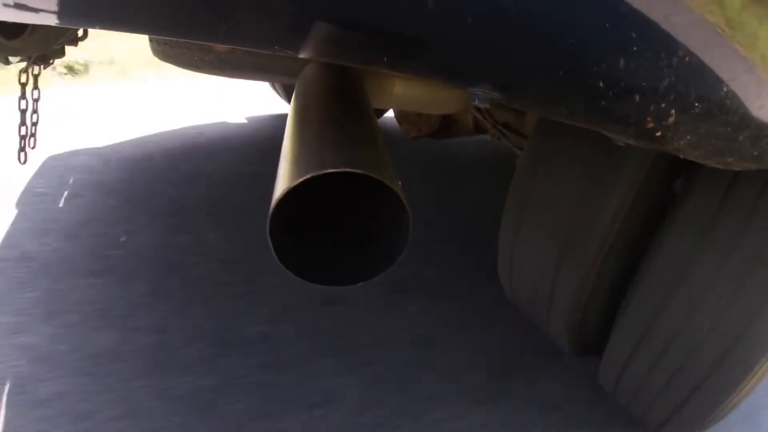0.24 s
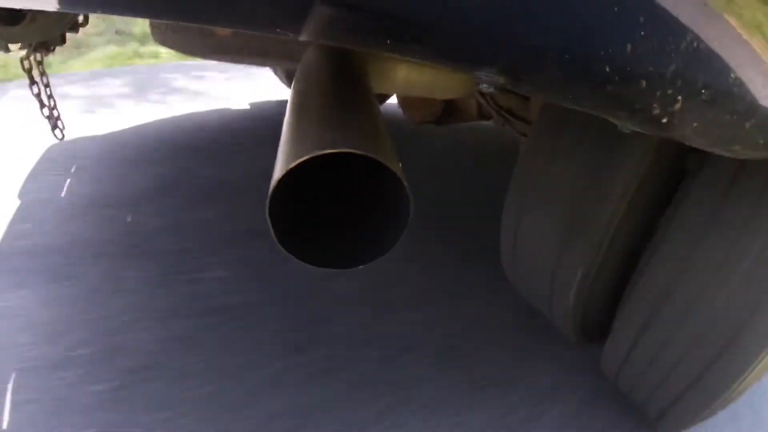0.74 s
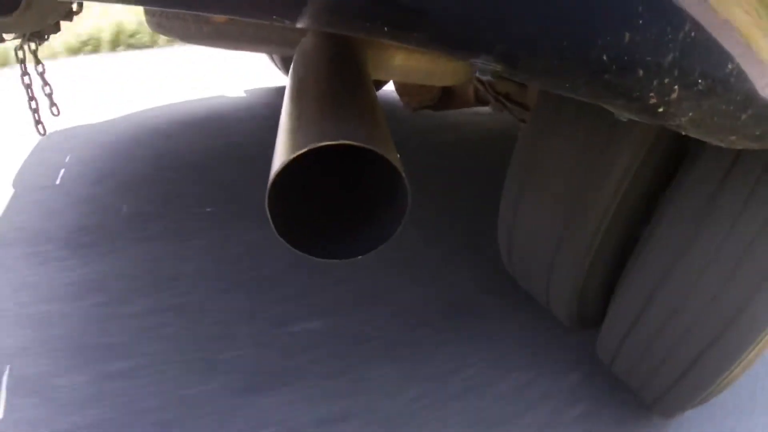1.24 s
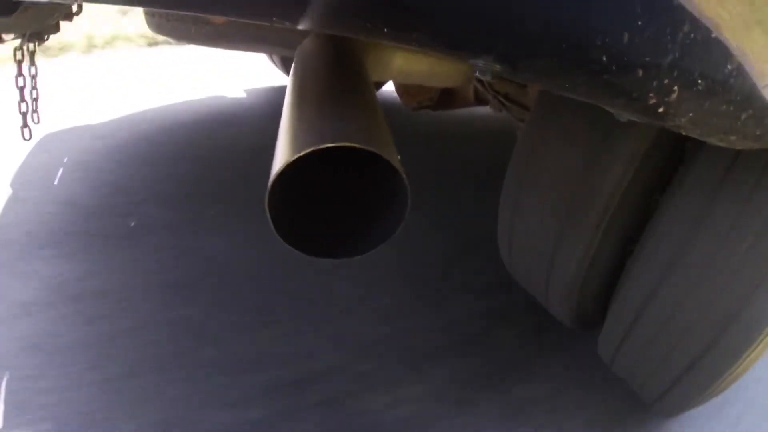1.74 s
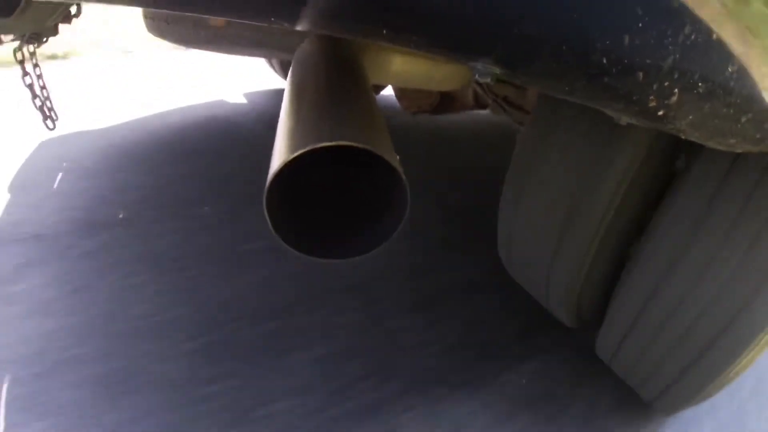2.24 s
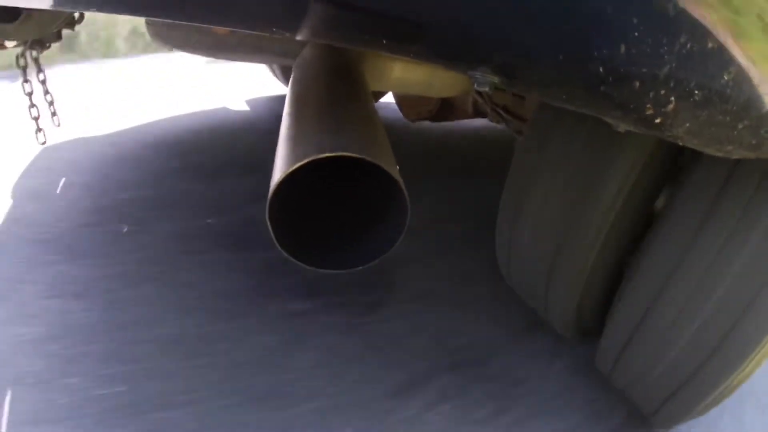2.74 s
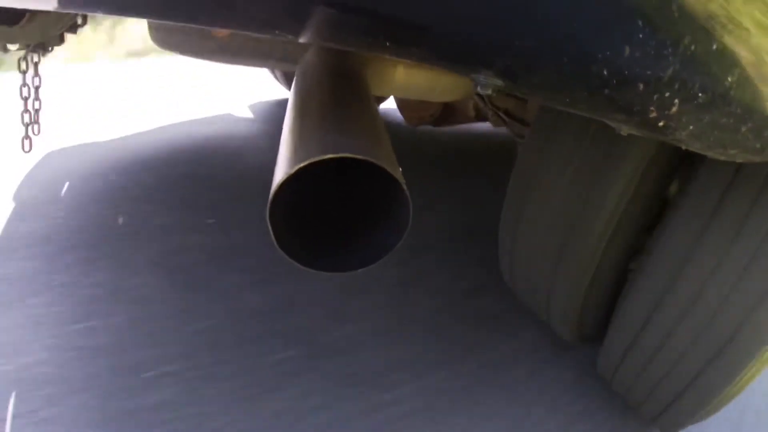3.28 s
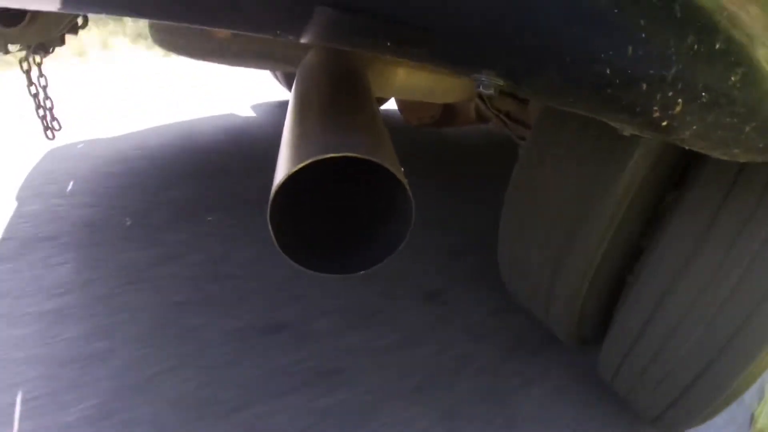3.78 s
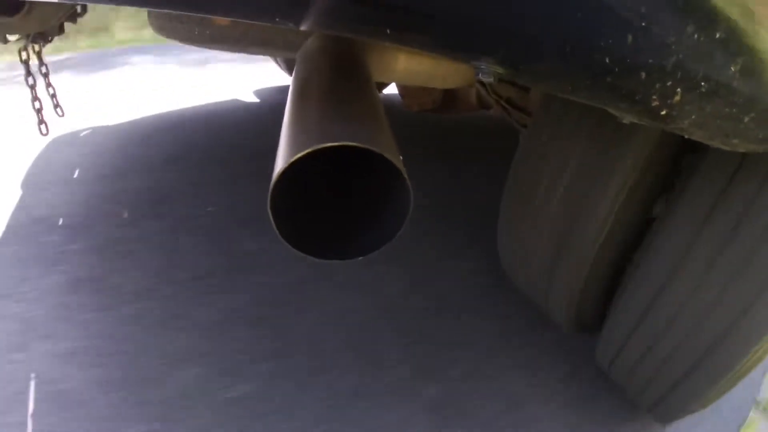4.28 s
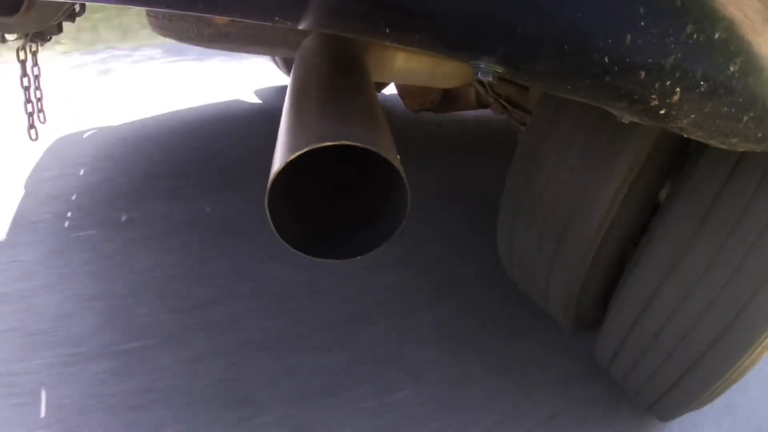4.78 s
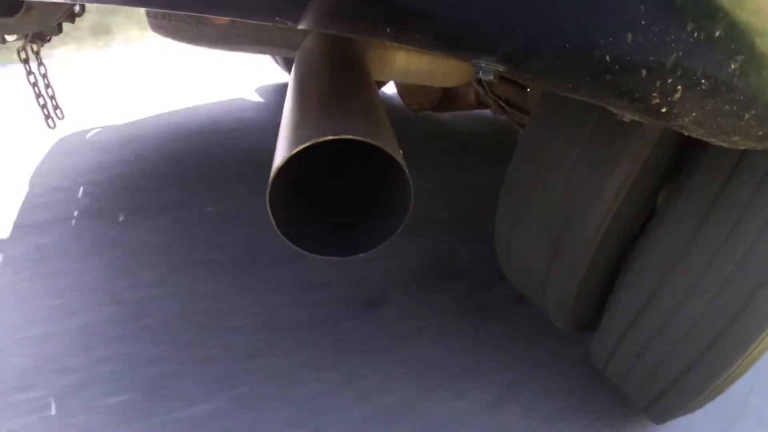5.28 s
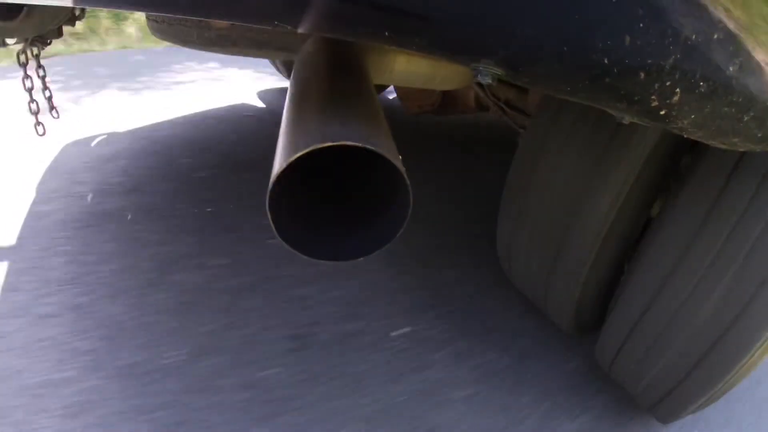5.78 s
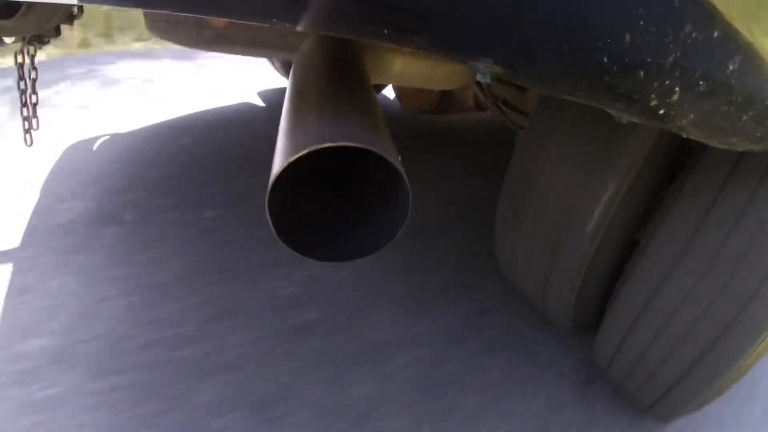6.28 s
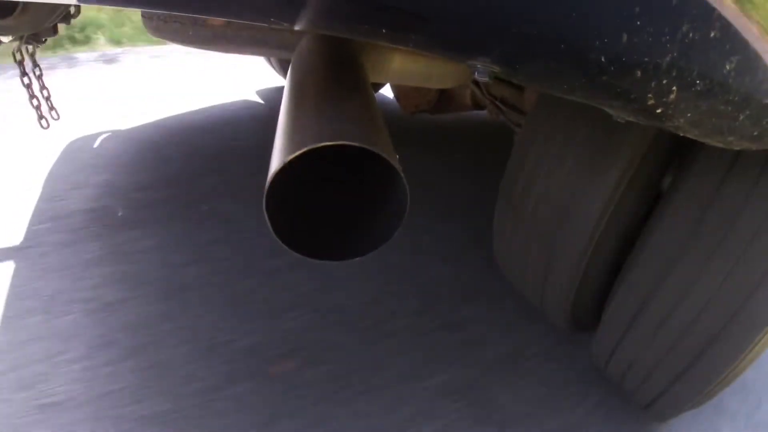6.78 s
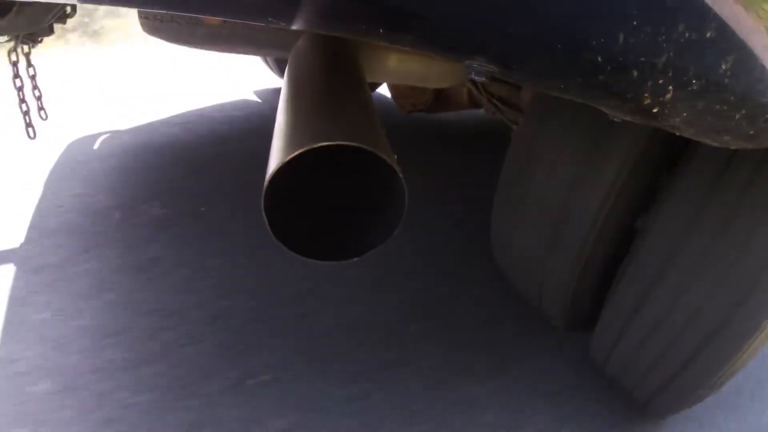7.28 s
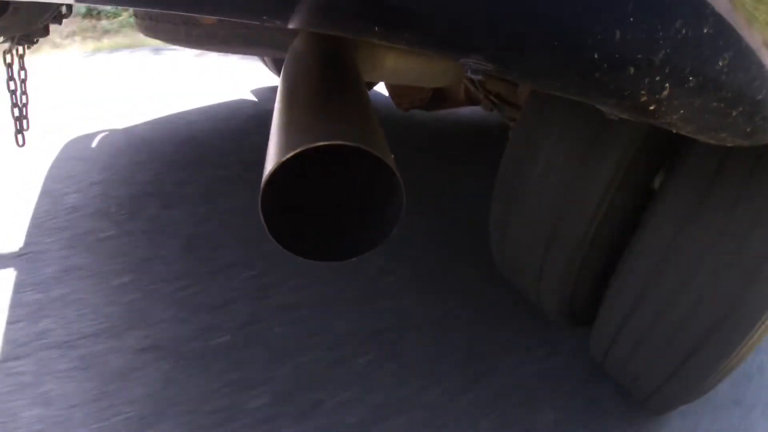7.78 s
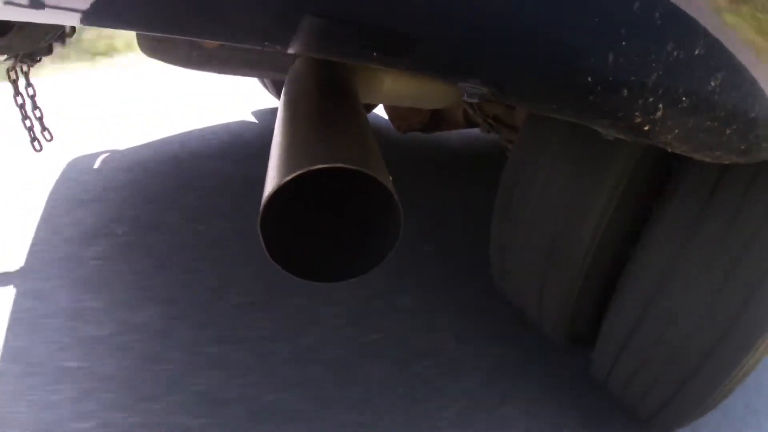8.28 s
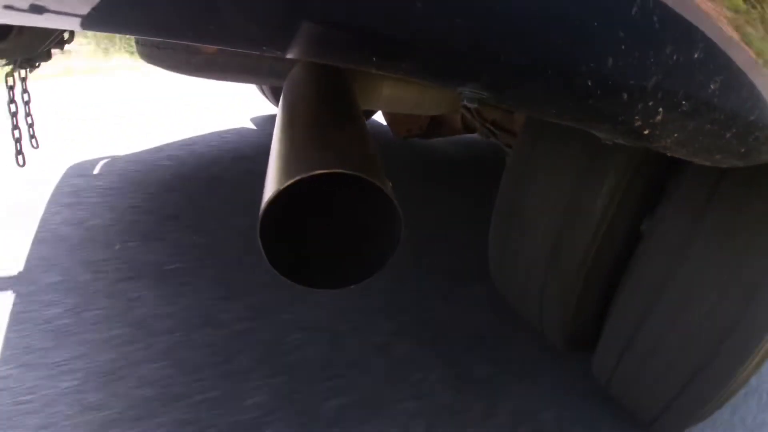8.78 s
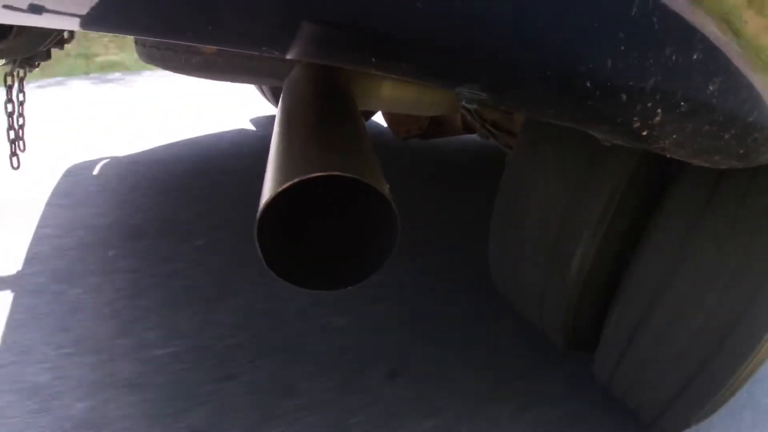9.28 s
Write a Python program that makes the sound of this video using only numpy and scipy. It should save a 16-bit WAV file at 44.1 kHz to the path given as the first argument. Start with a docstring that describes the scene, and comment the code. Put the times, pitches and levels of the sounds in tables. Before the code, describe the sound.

Close at the tailpipe, a driving diesel truck drones, sags, pulls harder and swells into rushing gas, over wind rumble and tyre noise.

```python
"""Diesel pickup at the tailpipe

On the road with a V8 diesel pickup, microphone just behind the pipe. The firing note drones and slowly
sags; at five seconds the engine picks up, lopes, pulls, and lopes again. Gas roars, rasps and hisses out
in puffs with a faint turbo whistle, swelling to a rush at the end. Wind buffets the mic; tyres roll by it."""
import sys
import numpy as np
from scipy import signal
from scipy.fft import rfft, irfft, next_fast_len
from scipy.io import wavfile
from scipy.ndimage import uniform_filter1d, minimum_filter1d

SR = 44100
rng = np.random.default_rng(int(sys.argv[2]) if len(sys.argv) > 2 else 0)


def log_audio(samples):
    """Write samples as a 16-bit WAV file to the path given in sys.argv[1]."""
    # one column per channel
    frames = np.atleast_2d(samples).T
    # limit to full scale, then quantise
    limited = np.clip(frames, -1, 1)
    pcm = np.round(limited * 32767).astype(np.int16)
    wavfile.write(sys.argv[1], SR, pcm)


N = 420273
TIME = np.arange(N) / SR
BIN_HZ = np.fft.rfftfreq(N, 1 / SR)
CYLINDERS = 8

# Engine speed. Each row: time in seconds, firings per second.
FIRING_RATE = [(0, 106.7), (1, 106.1), (2, 104.1), (3, 101.1), (4.5, 96.9), (5, 93.5), (5.1, 102),
               (5.45, 115), (5.75, 120), (6.1, 118.1), (7, 115.2), (8, 112.9), (8.8, 113.6), (9.2, 118.2),
               (9.53, 116)]
# How the engine runs. Each row: time in seconds, share of pulling, share of loping; the rest is cruising.
ENGINE_LOAD = [(0, 0.05, 0), (4.98, 0, 0.09), (5.07, 0.3, 1), (5.52, 0.18, 0.73), (5.66, 1, 0.03),
               (6.6, 0.98, 0.14), (8.08, 0.34, 0), (8.24, 0.12, 1), (9.53, 0.18, 0.86)]
# Surges of turbulence in the pipe. Each row: middle and length in seconds, then dB added to the low boom,
# to the hollow ring, and to hiss and rasp.
PIPE_SURGES = [(.05, 1.04, 10.5, 3.5, .7), (1.28, 0.48, 10, -0.5, 0.5), (2.33, .6, -3, -0.5, 2.2),
               (3.15, 1.38, 10.5, 2.5, 0.7), (4.25, 0.92, 9.5, 4, 0.9), (4.75, 0.51, 10, -0.5, .7),
               (5.1, 0.22, 2, 3.5, -2), (5.45, 0.49, 2.5, 5.5, 2), (7.9, 0.49, -1, 1.5, -0.5)]


def amp(db):
    """Decibels to gain."""
    return 10 ** (np.asarray(db) / 20)


def unit(x):
    """Scales to an rms of one."""
    return x / np.sqrt(np.mean(x ** 2) + 1e-20)


def curves(rows):
    """Each column of a time table, joined by straight lines."""
    seconds, *columns = np.transpose(rows)
    return [np.interp(TIME, seconds, column) for column in columns]


def swells(rows):
    """Each event rises and falls in one arch; one dB curve per strength column."""
    return sum(np.outer(db, np.maximum(1 - (2 * (TIME - middle) / length) ** 2, 0))
               for middle, length, *db in rows)


def shape(points):
    """A spectrum in dB, joined on a log-frequency axis."""
    hz, db = np.transpose(points)
    return np.interp(np.log(BIN_HZ + 1), np.log(hz), db)


def coloured(db):
    """Noise with the given spectrum and an rms of one."""
    size = next_fast_len(N, True)
    gain = np.interp(np.fft.rfftfreq(size, 1 / SR), BIN_HZ, amp(db))
    return unit(irfft(rfft(rng.standard_normal(size)) * gain, size)[:N])


def wander(rate_hz):
    """Smooth random drift, changing up to about the given rate."""
    return coloured(-20 * np.log10(1 + (BIN_HZ / rate_hz) ** 4))


def rush(start_s=8.393, rise_s=0.97):
    """Share of the final rush of gas, which builds smoothly from 0 to 1 and stays."""
    return np.sin(np.pi / 2 * np.clip((TIME - start_s) / rise_s, 0, 1)) ** 2


def level(cruise_db, pull_db, lope_db, rush_db):
    """A layer's cruising level in dB, plus what pulling, loping and the final rush add."""
    pull, lope = curves(ENGINE_LOAD)
    return cruise_db + pull_db * pull + lope_db * lope + rush_db * rush()


def drone(cycle):
    """The firing note, almost a sine after the long pipe; no two combustions are quite alike."""
    level_db = level(-12.5, pull_db=0.85, lope_db=-4.5, rush_db=-6.5) + 0.66 * wander(rate_hz=51)
    return np.sqrt(2) * amp(level_db) * np.cos(2 * np.pi * CYLINDERS * cycle)


def burble(cycle):
    """Unequal cylinders add lines at multiples of the cycle rate; their strength follows the load."""
    # Each row: multiple of the cycle rate, then rms level in dB when cruising, pulling and loping.
    cycle_lines = [(5, -46, -34, -40), (6, -51, -30, -25), (7, -36, -32, -33), (9, -31, -31, -30),
                   (10, -38, -27, -23), (11, -32, -30, -38), (12, -40, -35, -35), (13, -43, -36, -40),
                   (14, -41, -32, -33), (15, -53, -32, -45), (16, -39, -39, -31), (17, -43, -39, -44),
                   (18, -45, -42, -47), (19, -51, -54, -43), (20, -50, -40, -47), (22, -56, -36, -43),
                   (23, -57, -38, -52), (24, -48, -45, -47), (26, -50, -45, -47), (29, -55, -43, -57),
                   (30, -55, -44, -56), (31, -54, -41, -55), (32, -49, -59, -45), (35, -46, -56, -55),
                   (37, -54, -48, -57)]
    pull, lope = curves(ENGINE_LOAD)
    offsets = rng.uniform(0, 2 * np.pi, 64)
    angle = 2 * np.pi * cycle + 0.003 * wander(rate_hz=1.3)
    out = np.zeros(N)
    for multiple, cruise_db, pull_db, lope_db in cycle_lines:
        side = multiple - CYLINDERS
        # mirrored pairs around the firing note: the pulses vary more in timing than in size
        phase = np.pi / 2 + np.sign(side) * offsets[abs(side)]
        gain = (1 - pull - lope) * amp(cruise_db) + pull * amp(pull_db) + lope * amp(lope_db)
        out += gain * np.cos(multiple * angle + phase)
    return np.sqrt(2) * out


def puffs(cycle, depth, uneven, lag_rad):
    """Gas leaves in one puff per firing, some cylinders blowing harder than others."""
    angle = 2 * np.pi * cycle
    lopsided = np.cos(angle) + np.cos(2 * angle + 1) + np.cos(3 * angle - 1) + np.cos(4 * angle + 2)
    return unit((1 + depth * np.cos(CYLINDERS * angle - lag_rad)) * (1 + uneven * lopsided))


def roar(cycle):
    """Turbulent gas booms low in the pipe and rings in its two hollow resonances."""
    # Spectra of the low roar and the hollow ring. Each row: frequency in Hz, relative level in dB.
    low_spectrum = [(60, -24.5), (140, 2), (200, 4.5), (275, 5), (330, 3), (380, -11), (480, -12),
                    (1000, -51), (4000, -100)]
    hollow_spectrum = [(250, -25.5), (380, -5.5), (432, 2), (468, -4), (515, 1.5), (555, -5.5), (590, -8),
                       (635, -12), (700, -24.5), (1200, -37.5), (5000, -94)]
    boom_hz, boom_width_hz = 280, 85  # the pipe resonance that the surges excite
    pull, _ = curves(ENGINE_LOAD)
    boom_surge_db, hollow_surge_db, _ = swells(PIPE_SURGES)
    low_db = level(-40, pull_db=9, lope_db=8.5, rush_db=5) + 0.61 * boom_surge_db
    low = amp(low_db + wander(rate_hz=4.9)) * coloured(shape(low_spectrum))
    resonance_db = -20 * np.log10(1 + ((BIN_HZ - boom_hz) / boom_width_hz) ** 2)
    boom = amp(-42.5 + boom_surge_db) * coloured(resonance_db)
    hollow_db = level(-33.5, pull_db=0.9, lope_db=-0.5, rush_db=5) + hollow_surge_db
    hollow = amp(hollow_db + 0.95 * wander(rate_hz=13)) * coloured(shape(hollow_spectrum))
    return (low + boom + hollow) * puffs(cycle, depth=0.14, uneven=0.025 + 0.044 * pull, lag_rad=0.94)


def pipe_mouth():
    """Cross resonances and dips of the pipe mouth beside the microphone, as a spectrum in dB."""
    # Each row: centre in Hz, width in Hz, lift or cut in dB.
    resonances = [(790, 30, -1), (1001, 20, -4.5), (1222, 27, -3.1), (1360, 19, 1.5), (1610, 47, -2.5),
                  (1686, 45, 3), (1755, 59, -4.5), (2410, 41, 1.5), (2695, 190, -3.5), (2813, 65, 7.5),
                  (2970, 60, 6), (3255, 170, -6.5), (3520, 70, -2.5), (4003, 160, 5), (3970, 47, 0.5),
                  (4760, 160, 5.5), (8200, 250, 3)]
    return sum(db * np.exp(-((BIN_HZ - hz) / width) ** 2) for hz, width, db in resonances)


def rasp(cycle):
    """Each firing ends in a dry, metallic burst, strongest when the engine pulls."""
    # Colour of the burst. Each row: frequency in Hz, relative level in dB.
    spectrum = [(600, -23), (1050, -8.5), (1400, 0.5), (1680, 4.5), (2300, -4.5), (2900, -14.5),
                (4500, -19.5), (14000, -73.5)]
    _, _, surge_db = swells(PIPE_SURGES)
    level_db = level(-41, pull_db=5, lope_db=-7, rush_db=3) + surge_db
    noise = coloured(shape(spectrum) + pipe_mouth())
    return amp(level_db) * noise * puffs(cycle, depth=0.34, uneven=0.08, lag_rad=2.6)


def hiss(cycle):
    """The jet at the pipe mouth: duller while the engine lopes, brighter when the gas is fast."""
    # The jet's spectrum and its two tints. Each row: frequency in Hz, relative level in dB.
    spectrum = [(400, -28), (900, -11.5), (1450, -4), (2300, 0.5), (3000, -6), (4000, -6), (5100, -2.5),
                (5700, -10.5), (6700, -16), (7200, -25), (8800, -23.5), (9300, -35), (10400, -32),
                (11200, -44), (13500, -46), (14500, -59)]
    lope_tint = [(1000, 2), (4800, -0.5), (5500, -1), (6300, -3), (7000, -1.5), (12000, -.5)]
    rush_tint = [(1000, -8.5), (1600, 1), (2200, 0), (2700, 2.5), (4500, 1), (6000, -1.5), (12000, -1)]
    _, lope = curves(ENGINE_LOAD)
    colour = shape(spectrum) + pipe_mouth()
    slow = np.sqrt(1 - lope) * coloured(colour) + np.sqrt(lope) * coloured(colour + shape(lope_tint))
    fast = coloured(colour + shape(rush_tint))
    jet = np.sqrt(1 - rush()) * slow + np.sqrt(rush()) * fast
    _, _, surge_db = swells(PIPE_SURGES)
    flow_db = level(-39.5, pull_db=4, lope_db=-1.7, rush_db=18) + surge_db + 0.61 * wander(rate_hz=21)
    return amp(flow_db) * jet * puffs(cycle, depth=0.096, uneven=0.022, lag_rad=3.1)


def turbo(cycle):
    """The turbo whistle starts afresh with each puff, so it splits into lines one firing rate apart."""
    # Turbo speed. Each row: time in seconds, whistle pitch in Hz.
    pitch = [(0, 5970), (2.3, 5460), (3.6, 5260), (4.2, 4980), (4.98, 5040), (5.08, 4760), (5.5, 4860),
             (6.6, 5380), (8.1, 5980), (8.25, 5440), (8.85, 5250), (9.25, 5800), (9.53, 6300)]
    spin_up_hz_per_s = 38000  # each puff spins the turbine up a little
    peak_hz, width_hz, lift_db = 5000, 260, 12  # the whistle swells at this pipe resonance
    hz, = curves(pitch)
    firing_hz, = curves(FIRING_RATE)
    in_puff = (CYLINDERS * cycle) % 1 - 0.5
    from_middle_s = in_puff / firing_hz
    angle = 2 * np.pi * (hz + spin_up_hz_per_s * from_middle_s / 2) * from_middle_s
    gate = np.sqrt(abs(np.cos(np.pi * in_puff)))
    fuzz = wander(rate_hz=210) + 1j * wander(rate_hz=320)
    whistle = unit(gate * (np.exp(1j * angle) * (1 + 0.59 * fuzz)).real)
    overtone = unit(gate * (np.exp(2j * angle) * fuzz).real)
    ringing = np.exp(-((hz - peak_hz) / width_hz) ** 2)
    whistle_db = level(-55.5, pull_db=-1, lope_db=0, rush_db=12) + lift_db * ringing
    loss_db = 0.012 * np.maximum(hz - peak_hz, 0)  # above the peak the pipe swallows the overtone
    overtone_db = level(-74.5, pull_db=-2, lope_db=1, rush_db=17) - loss_db
    return amp(whistle_db) * whistle + amp(overtone_db) * overtone


def wind():
    """Gusts buffet the microphone with a deep rumble."""
    # Each row: middle of the gust in seconds, length in seconds, strength in dB.
    gusts = [(.72, .35, 4), (1.82, 0.52, 3), (2.67, .22, 2), (3.48, 0.74, 6.5), (4.25, 0.43, 0.5),
             (4.7, .2, 0), (8.4, 0.19, 3), (9.2, .25, 1)]
    # Colour of the rumble. Each row: frequency in Hz, relative level in dB.
    spectrum = [(6, -26.5), (14, -8), (28, 0.5), (55, -2.5), (90, -2.5), (130, -6), (190, -22),
                (400, -33.5), (2000, -100)]
    gust_db, = swells(gusts)
    level_db = level(-28.3, pull_db=1, lope_db=5.5, rush_db=1) + gust_db + 3.7 * wander(rate_hz=23)
    return amp(level_db) * coloured(shape(spectrum))


def tyres(fade_db_per_s=0.49):
    """Tyres roll on the road, their noise coloured by the pipe mouth."""
    # Colour of the rolling noise. Each row: frequency in Hz, relative level in dB.
    spectrum = [(200, -30.5), (500, -5), (700, 1), (880, 0), (1100, -2.5), (1500, -6.5), (2500, -18),
                (6000, -44.5), (14000, -77)]
    level_db = level(-37, pull_db=1.5, lope_db=0.5, rush_db=5.5) - fade_db_per_s * TIME
    return amp(level_db + 0.8 * wander(rate_hz=7.2)) * coloured(shape(spectrum) + pipe_mouth())


def scene():
    """One microphone hears the exhaust, which follows the turning engine, amid wind and tyres."""
    firing_hz, = curves(FIRING_RATE)
    cycle = np.cumsum(firing_hz) / SR / CYLINDERS  # counts engine cycles, eight firings each
    exhaust = drone(cycle) + burble(cycle) + roar(cycle) + rasp(cycle) + hiss(cycle) + turbo(cycle)
    return (exhaust + wind() + tyres())[None]


def record(dry, ceiling=0.6, cutoff_hz=14000):
    """A limiter holds down the loudest peaks; a low-pass trims the top treble."""
    allowed = np.minimum(1, ceiling / (abs(dry) + 1e-9))
    gain = uniform_filter1d(minimum_filter1d(allowed, size=600), size=600)
    low_pass = signal.firwin(511, cutoff_hz, window=("kaiser", 9), fs=SR)
    return signal.oaconvolve(dry * gain, low_pass[None], "same")


dry = scene()
out = record(dry)
log_audio(out)
```